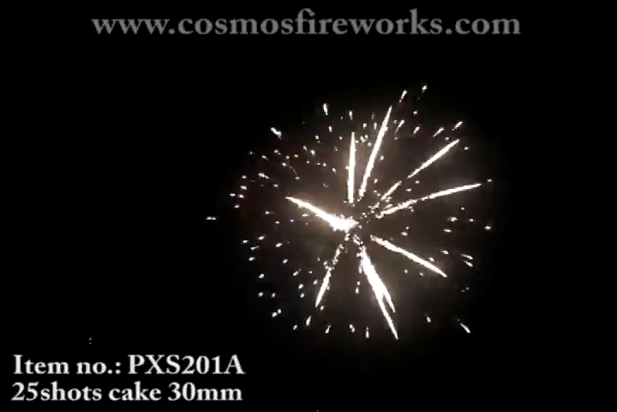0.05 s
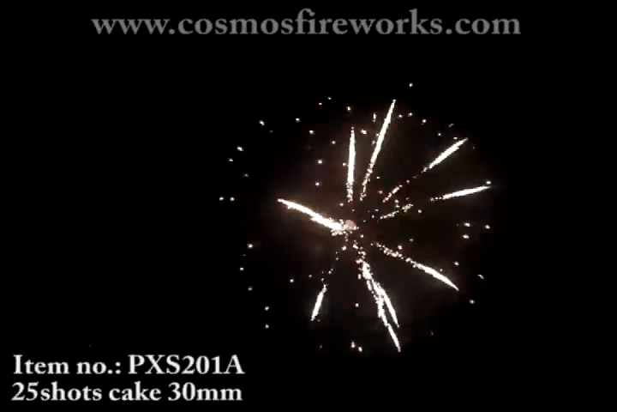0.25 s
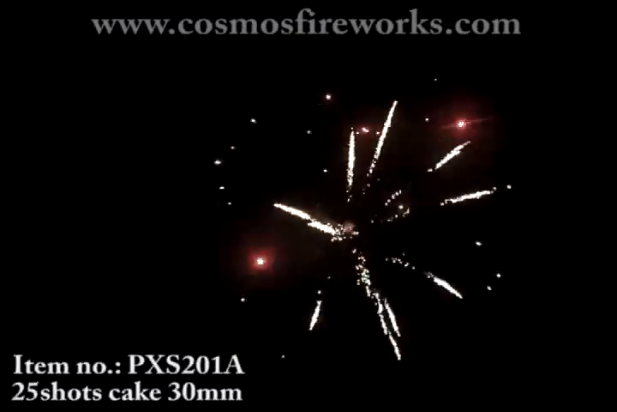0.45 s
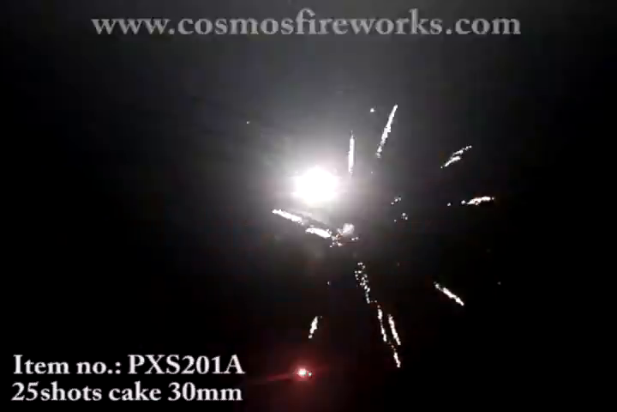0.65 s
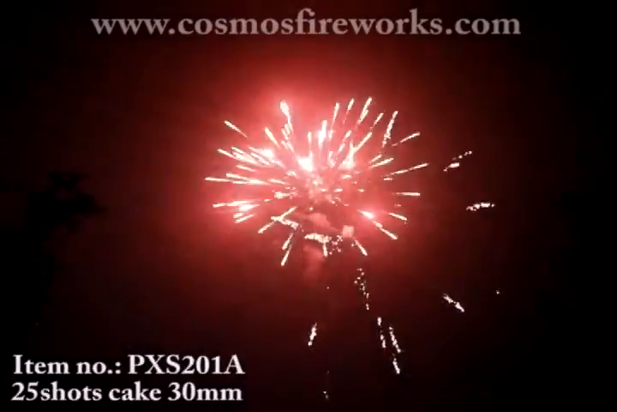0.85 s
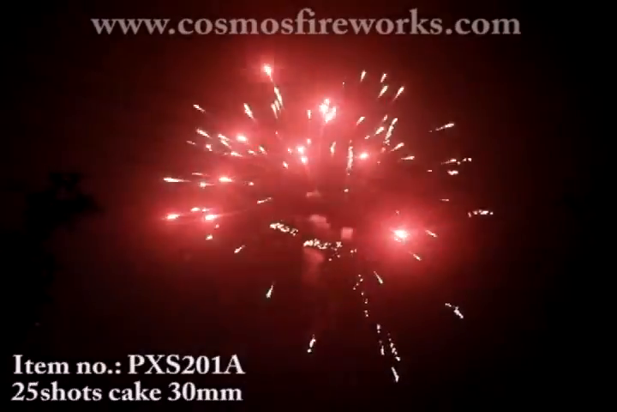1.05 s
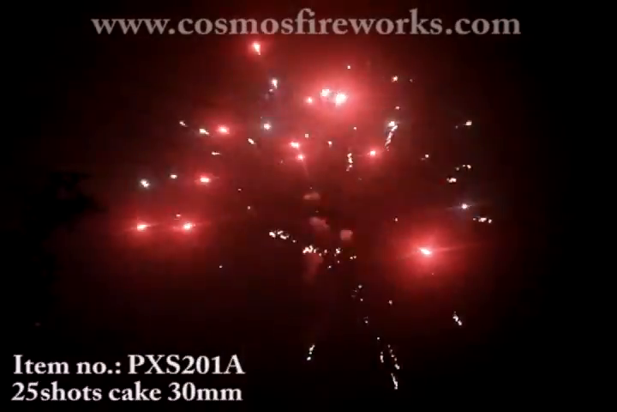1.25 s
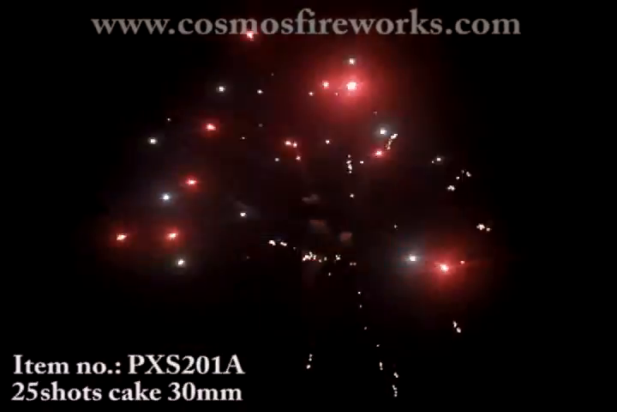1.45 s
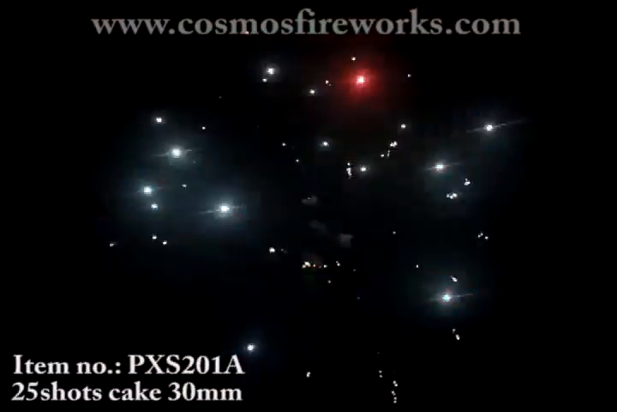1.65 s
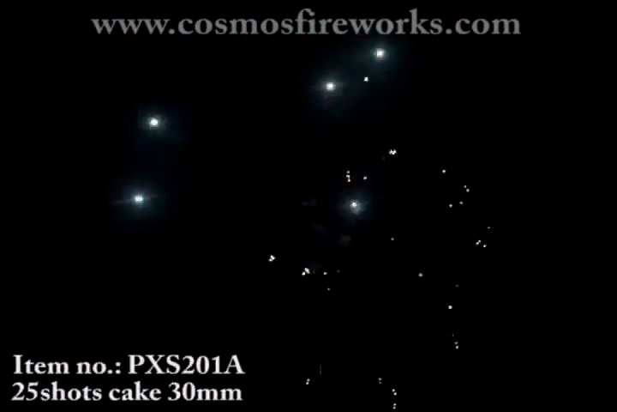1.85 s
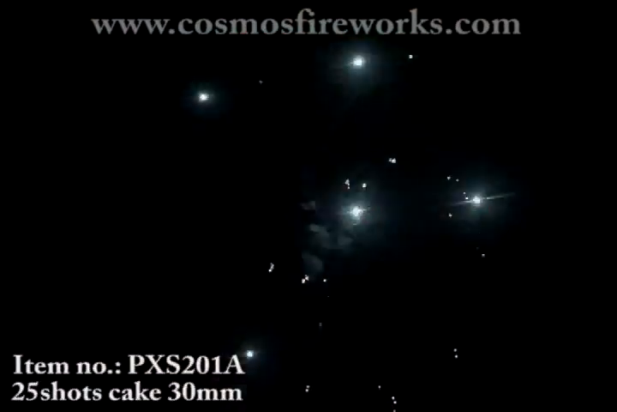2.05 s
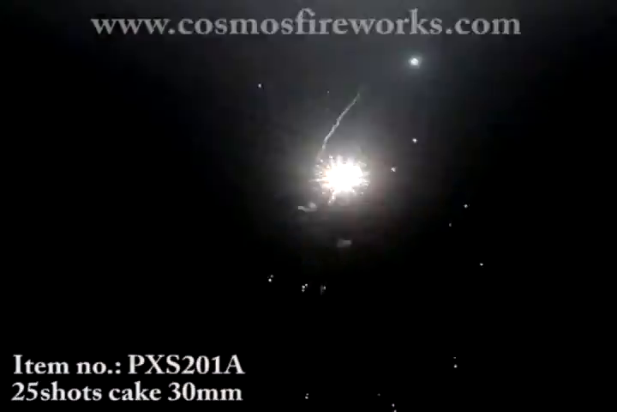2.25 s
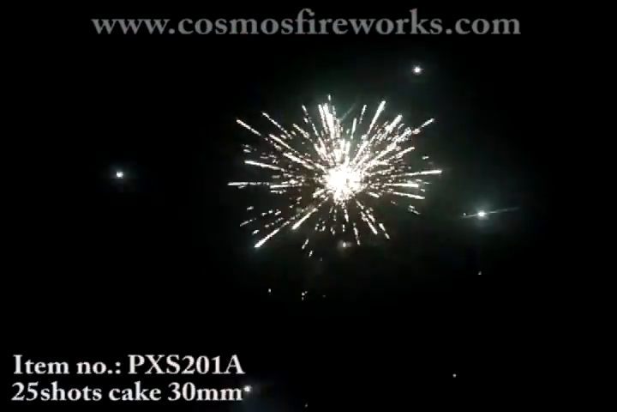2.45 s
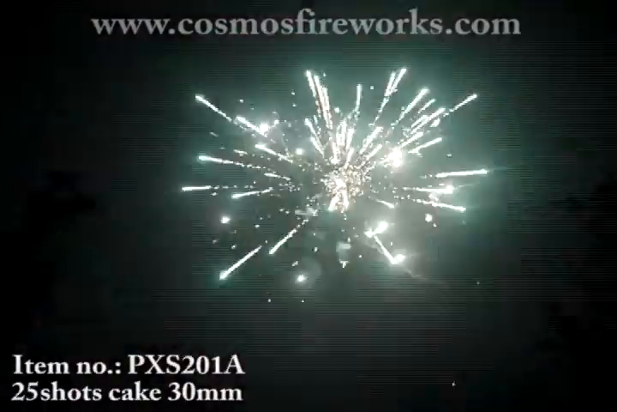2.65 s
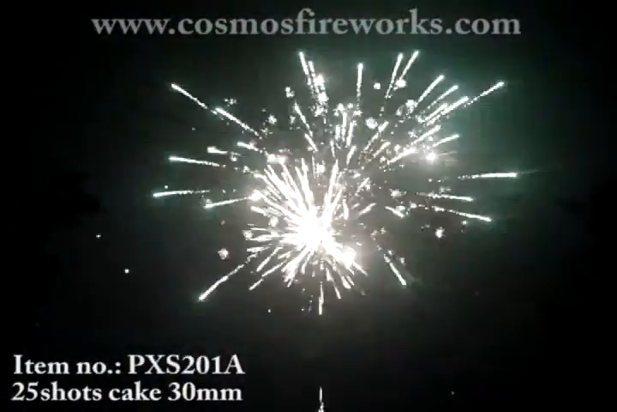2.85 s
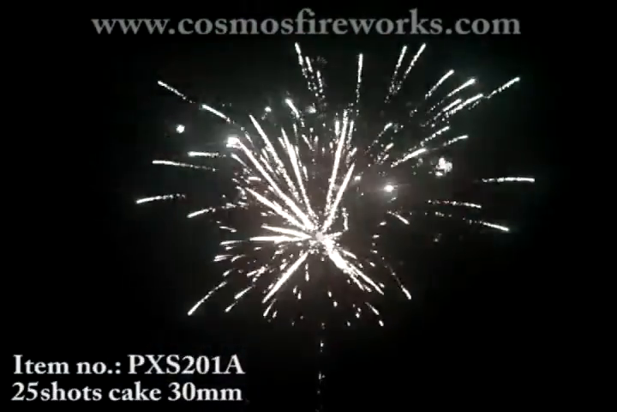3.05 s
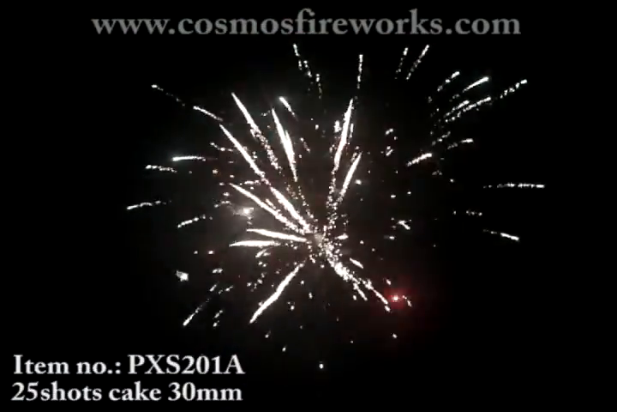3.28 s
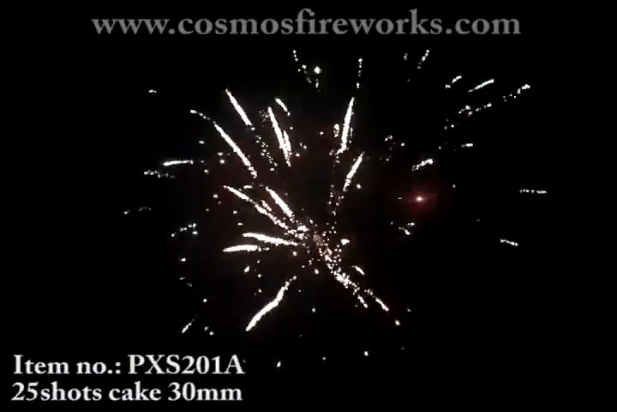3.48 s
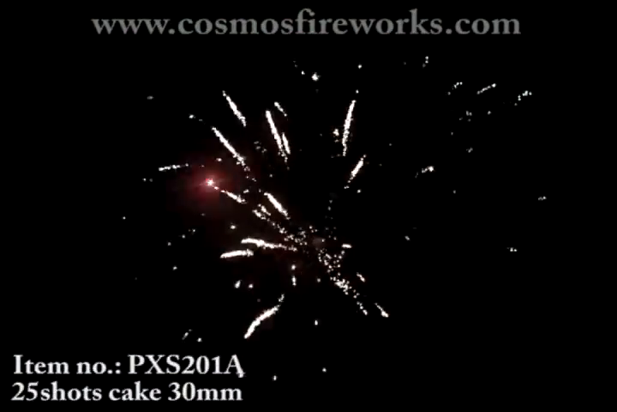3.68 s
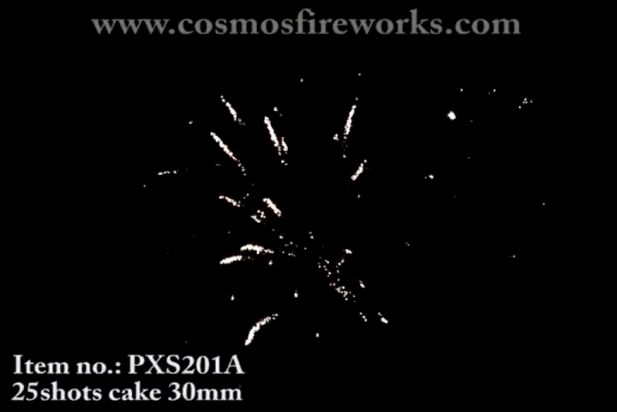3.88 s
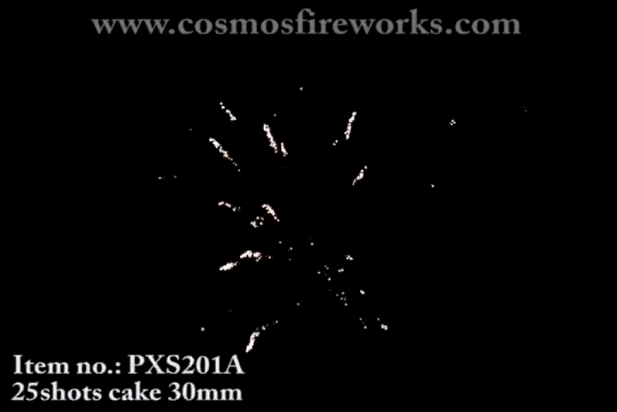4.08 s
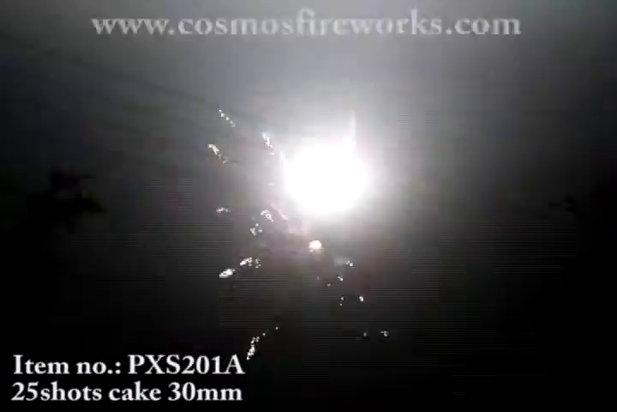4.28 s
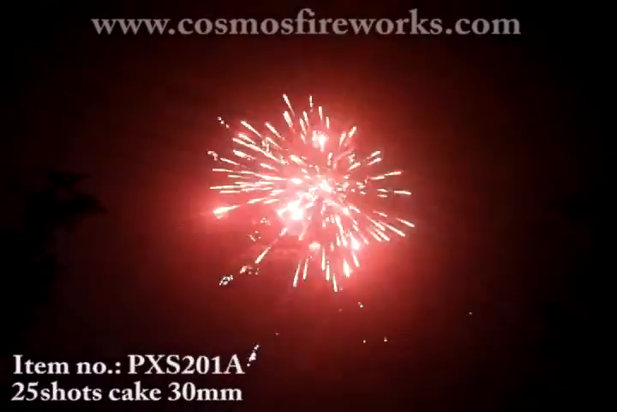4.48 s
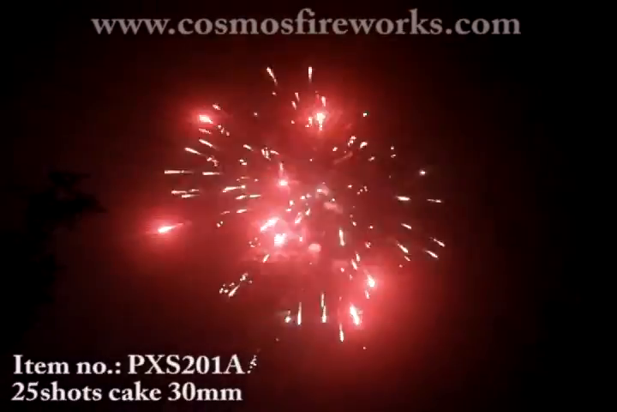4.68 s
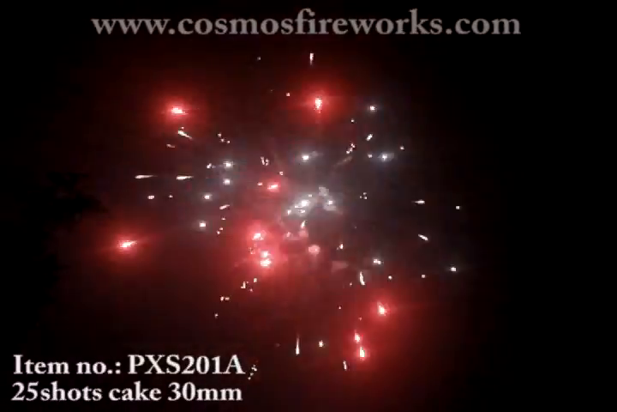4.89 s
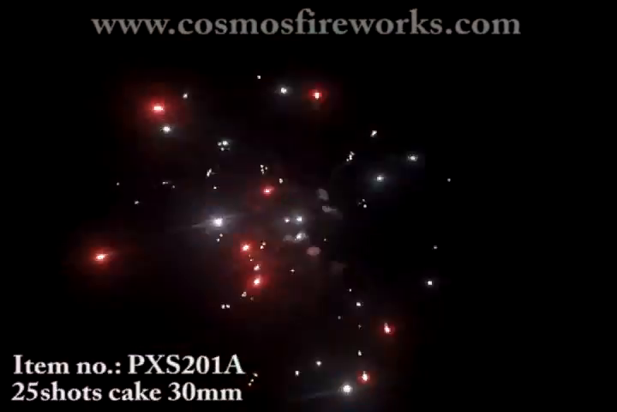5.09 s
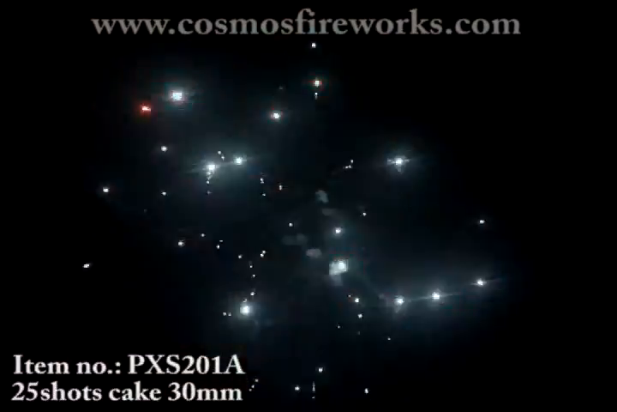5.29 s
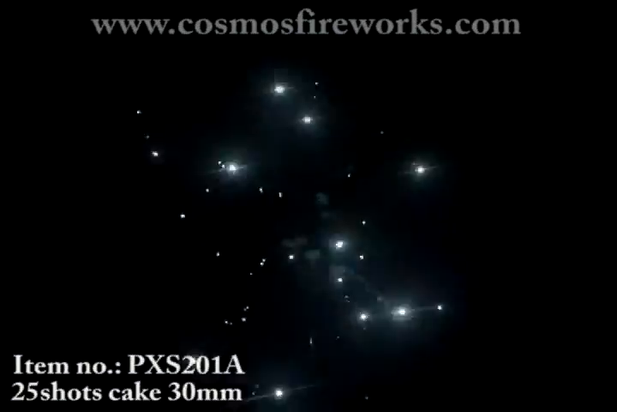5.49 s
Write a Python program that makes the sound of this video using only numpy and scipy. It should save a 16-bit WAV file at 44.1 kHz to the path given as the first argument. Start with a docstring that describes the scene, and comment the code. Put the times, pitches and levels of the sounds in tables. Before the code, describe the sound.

Open land at night, firework shells heard through a close, overloaded microphone. The sound begins in the tail of a burst, with a tree-line echo and dull knocks around 0.2 to 0.4 seconds and a sharp pop at 0.7. A hard bang hits at 1.0, with a short low ring, a noisy crack and an immediate wall slap; trees answer at 1.4, then woods and slopes return a rushing roll. A smaller pop snaps at 1.7 and the roll fades. The strongest bang comes at 2.6, another at 3.1, with bright crackling stars around and after them, densest from 3.0 to 3.5 and thinning by 3.8. Echoes sink into a faint airy hiss until about 4.6, when another heavy bang bursts at 4.66. Its tree echo arrives at 5.05, a pop snaps at 5.15, and the slopes roll back near 5.7. Loud hits clip and duck the level, which then recovers.

```python
"""Open land at night, with woods and slopes around: a firework cake fires shells close to a microphone.
Bursts ring damped low modes with a noise crack and a wall slap; the first starts before time zero.
Pops are shock pulses over a thump; crackling stars are tiny shocks; knocks are noise clumps on a low sine.
Filtered noise and click trains follow summed echoes of ground, tree line, woods and slopes, duller with travel.
The gain ducks on loud sound, then recovers; what is still too strong clips hard."""
import sys
import numpy as np
from scipy import signal
from scipy.fft import rfft, irfft
from scipy.io import wavfile

SR = 44100
rng = np.random.default_rng(int(sys.argv[2]) if len(sys.argv) > 2 else 0)


def put_to_file(sound):
    """Save the sound as 16-bit audio at rate SR, in the file named by the first command-line argument."""
    columns = np.atleast_2d(sound).T  # one column per channel
    safe = np.clip(columns, -1, 1)
    whole_steps = np.round(safe * 32767)
    wavfile.write(sys.argv[1], SR, whole_steps.astype(np.int16))


N = 243873  # samples

# Shell bursts; wall level is relative to the burst: start_s, strength_db, crack_db, pitch_factor,
# wall_db, tree_line_db, woods_db, slopes_delay_s, slopes_db
SHELL_BURSTS = [(-.085, 8, -2, 1.4, 2, -1, 3, 2.5, -7.5), (1.0178, 13, 0.5, 1.1, -5.5, -2, 0, 1.12, 0),
                (2.6210, 17, -3.5, 1.05, -8, -1, -4.5, 1.24, -7.5),
                (3.0630, 10, 1, 1.033, -6.5, -8, -4.5, 1.327, -3.5),
                (4.6576, 14.5, -2, 0.92, -7, 0, -3.5, 1.02, 1)]
# Travel times of each burst's sharp echoes: wall_delay_s, tree_line_delay_s
ECHO_DELAYS = [(.048, .408), (.0480, .383), (.0471, .391), (.0492, .356), (.0477, .390)]
# Modes a blast sets ringing near the microphone, before each burst's pitch factor and strength:
# mode_hz, relative_db, t60_s
BOOM_MODES = [(169.5, -22.5, 0.22), (223.6, -3.5, 0.037), (283, -1.5, 0.035), (330, 2, 0.031),
              (425.7, -5, 0.043), (567, -11.5, 0.022), (902.5, -2.5, 0.022)]
# Relative spectra of ground scatter and of the air's low roll, mid rush and high fizz: freq_hz, db_per_hz
SCATTER_SPECTRUM = [(30, -27), (80, 4.5), (170, 6.5), (300, 13.5), (450, 3), (650, -2), (1000, -1),
                    (2000, -7.5), (4000, -13), (8000, -25), (15000, -20.5)]
ROLL_SPECTRUM = [(20, -61), (50, -19.5), (100, -6.5), (160, -3), (260, 0.5), (350, 1), (450, -0.5),
                 (600, -18.5), (1200, -63), (4000, -71)]
RUSH_SPECTRUM = [(30, -31), (100, -35), (300, 0), (600, 1.5), (900, 3), (1300, 0), (1800, -2), (2600, -6),
                 (4000, -12.5), (6000, -23), (9000, -37.5), (15000, -104)]
FIZZ_SPECTRUM = [(500, -29), (3000, 7), (6000, 8.5), (9000, 6.5), (12000, 3.5), (15000, -14), (17000, -36)]
# How each part of the land returns a burst: rise_db_per_s, hold_s, fall_db_per_s,
# (roll_db, rush_db, bright_edge_db, fizz_db)
GROUND = (900, 0.017, 18.4, (-20.5, -34.5, -37, -34.5))
TREE_LINE = (119, 0.013, 115, (-18.5, -24, -21.5, -28))
WOODS = (43, 0.2, 21.2, (-24, -24, -27, -44.5))
SLOPES = (30, 0.11, 33, (-23.5, -23, -31.5, -61))
# Air loss per second of travel: roll_db_per_s, rush_db_per_s, bright_edge_db_per_s, fizz_db_per_s
AIR_LOSS_DB_PER_S = (2.4, .3, 10.9, 37.2)
# The night's own noise: roll_db, rush_db, bright_edge_db, fizz_db
NIGHT_DB = (-34.5, -34.5, -50, -65)
# Hard surfaces near the tree line: after_tree_line_echo_s, level_db (relative to the tree line level)
TREE_KNOCKS = [(-.06, -14.5), (0, -7), (.018, -9), (0.068, -14.5)]
# More dull knocks, each with its own time and bass: start_s, level_db, bass_db
DULL_KNOCKS = [(.212, -17.5, -34), (.243, -13.5, -21), (.256, -10, -13.5), (0.7787, -14.5, -17),
               (2.274, -28, -34), (4.3053, -31, -25)]
# Nearest crackling stars: start_s, peak_db
NEAR_STARS = [(.3388, -3), (2.7806, 2), (2.9910, 0), (2.9930, 0), (3.0362, -4), (3.0497, -1), (3.1985, -6),
              (3.3984, 0), (3.4215, 0), (3.4258, 2), (3.4428, -1), (3.5145, -5), (3.7028, -2), (3.7800, 0),
              (3.7891, -9), (3.8275, -10)]
# Pops: start_s, snap_db, snap_push_s, thump_db, spray_db
POPS = [(0.7193, 16, 0.00038, -0.5, -4), (1.6730, 10, 0.00019, -4.5, -8), (5.1506, 14, 0.00031, -8.5, -10)]

WOODS_BEHIND_S = 0.11  # after the tree line
RANDOM_STARS, RANDOM_STAR_DB, RANDOM_STAR_SPAN_S = 18, -8, (2.95, 3.47)
DUCK_ABOVE_DB, DUCK_ATTACK_S, RECOVER_DB_PER_S = -12.5, 0.16, 27.5
CLIP_LEVEL, BAND_LIMIT_HZ = 0.985, 15950


def gain_of(db):
    """Decibels to amplitude."""
    return 10 ** (np.asarray(db) / 20)


def decay(t, level_db, t60_s):
    """Exponential decay from level_db, 60 dB per t60_s."""
    return gain_of(level_db - 60 * t / t60_s)


def evened(x):
    """Scales to rms 1."""
    return x / np.sqrt(np.mean(x ** 2) + 1e-20)


def noise(t):
    """White noise, one draw per time step."""
    return rng.standard_normal(len(t))


def read(points, hz):
    """Joins spectrum points by lines on a log-frequency axis."""
    f, value = np.transpose(points)
    return np.interp(np.log(hz + 1), np.log(f + 1), value)


def add(mix, start_s, sound):
    """Adds a sound into the mix; what falls outside is dropped."""
    start = round(start_s * SR)
    sound = sound[max(-start, 0):]
    part = mix[max(start, 0):][:len(sound)]
    part += sound[:len(part)]


def band(x, low_hz, high_hz, order=1):
    """Causal band-pass."""
    edges_hz = [low_hz, min(high_hz, SR / 2 - 1)]
    return signal.sosfilt(signal.butter(order, edges_hz, "band", fs=SR, output="sos"), x)


def coloured(x, spectrum):
    """Gives x a spectrum, at rms 1."""
    shape_db = read(spectrum, np.fft.rfftfreq(len(x), 1 / SR))
    return evened(irfft(rfft(x) * gain_of(shape_db), len(x)))


def blast(t, push_s):
    """A shock front: a sudden push, then a longer, weaker suction."""
    return (1 - t / push_s) * np.exp(-t / push_s)


def bursts():
    """Each shock rings low modes; ground scatter follows and a wall returns it duller."""
    out, t = np.zeros(N), np.arange(SR // 3) / SR
    for burst, (wall_s, _) in zip(SHELL_BURSTS, ECHO_DELAYS):
        start_s, strength_db, crack_db, pitch, wall_db, *_ = burst
        boom = sum(decay(t, db, t60_s) * np.cos(2 * np.pi * hz * pitch * t) for hz, db, t60_s in BOOM_MODES)
        boom += decay(t, 8.5, t60_s=0.0018) * noise(t)  # the casing tears
        scatter = coloured(noise(t), SCATTER_SPECTRUM)
        scatter *= decay(t, -14.5, t60_s=0.059) + decay(t, -17.5, t60_s=0.17)
        add(boom, 0.004, gain_of(crack_db) * scatter)
        wall_slap = gain_of(strength_db + wall_db) * band(boom, 66, 6000)
        add(out, start_s + wall_s, wall_slap)
        # one hard bounce off the ground close by, with a deep push under it
        crack = band(noise(t), 1400, 11000) * decay(t, crack_db, t60_s=0.0041)
        push = decay(t, -26.0, t60_s=0.044) * np.sin(2 * np.pi * 65 * t)
        push += gain_of(-13.5) * blast(t, push_s=0.0014)
        add(boom, 0.0042, crack + push)
        add(out, start_s, gain_of(strength_db) * boom)
    return out


def echo_power(age_s, delay_s, level_db, land):
    """One echo in four bands: rises until its delay, holds, falls; air loss grows with age."""
    rise_db_per_s, hold_s, fall_db_per_s, bands_db = land
    shape_db = -rise_db_per_s * np.maximum(delay_s - age_s, 0)
    shape_db -= fall_db_per_s * np.maximum(age_s - delay_s - hold_s, 0)
    loss_db = np.outer(AIR_LOSS_DB_PER_S, np.maximum(age_s, 0))
    return (age_s > 0) * gain_of(level_db + shape_db + np.array(bands_db)[:, None] - loss_db) ** 2


def echo_levels():
    """Sums burst echoes and night noise as power: dB curves of roll, rush, bright edge, fizz."""
    t = np.arange(0, N, 64) / SR
    power = gain_of(NIGHT_DB)[:, None] ** 2
    for burst, (_, trees_s) in zip(SHELL_BURSTS, ECHO_DELAYS):
        start_s, *_, trees_db, woods_db, slopes_s, slopes_db = burst
        paths = [(0, 0, GROUND),
                 (trees_s, trees_db, TREE_LINE),
                 (trees_s + WOODS_BEHIND_S, woods_db, WOODS),
                 (slopes_s, slopes_db, SLOPES)]
        power = power + sum(echo_power(t - start_s, *path) for path in paths)
    return [np.interp(np.arange(N) / SR, t, 10 * np.log10(p)) for p in power]


def wander(top_hz):
    """Random drift of rms 1, from top_hz / 4 to top_hz."""
    hz = np.fft.rfftfreq(N, 1 / SR)
    inside = (hz > top_hz / 4) * (hz < top_hz)
    return evened(irfft(rfft(rng.standard_normal(N)) * inside, N))


def grains(per_s, spread_db):
    """Random click train of rms 1, a few clicks much larger than the rest."""
    size = gain_of(spread_db * np.minimum(rng.exponential(1, N), 4))
    return evened(size * rng.standard_normal(N) * (rng.random(N) < per_s / SR))


def follow(x, level_db, low_hz, high_hz):
    """Scales x to unit level in the band low_hz..high_hz, then applies a level curve."""
    hz = np.fft.rfftfreq(N, 1 / SR)
    in_band = abs(hz - (low_hz + high_hz) / 2) < (high_hz - low_hz) / 2
    inside = irfft(rfft(x) * in_band, N)
    return x / inside.std() * gain_of(level_db)


def air():
    """Countless small echoes: lumpy low roll, grainy rush that dulls as it fades, thin fizz."""
    roll_db, rush_db, bright_db, fizz_db = echo_levels()
    lumps, surges = wander(top_hz=18), wander(top_hz=30)
    roll = coloured(rng.standard_normal(N), ROLL_SPECTRUM)
    rush = coloured(grains(per_s=11000, spread_db=0.66), RUSH_SPECTRUM)
    dull = signal.sosfiltfilt(signal.butter(2, 2800, fs=SR, output="sos"), rush)
    fizz = coloured(grains(per_s=6400, spread_db=1.5), FIZZ_SPECTRUM)
    roll = follow(roll, roll_db, 150, 500)
    body = follow(dull, rush_db, 600, 2500)
    bright_edge = follow(rush - dull, bright_db, 3000, 5500)
    fizz = follow(fizz, fizz_db, 8000, 13000)
    lumpy_roll = gain_of(-1.3 + 1.24 * lumps) * roll
    surging_rush = gain_of(0.76 * surges) * (gain_of(-1.17) * body + gain_of(-2.5) * bright_edge)
    return lumpy_roll + surging_rush + gain_of(-0.9) * fizz


def knock(level_db, bass_db):
    """A dull knock: a short, ragged noise clump over a low bump, with little treble."""
    t = np.arange(SR // 10) / SR
    clump = band(evened(band(noise(t), 380, 870)), 70, 3750, order=2)
    bump = np.sin(2 * np.pi * 125 * t)
    return decay(t, level_db, t60_s=0.046) * clump + decay(t, bass_db, t60_s=0.063) * bump


def knocks():
    """Hard surfaces by the tree line return every burst; a few more dull knocks have own time and bass."""
    out = np.zeros(N)
    for burst, (_, trees_s) in zip(SHELL_BURSTS, ECHO_DELAYS):
        start_s, *_, trees_db, _, _, _ = burst
        for after_s, relative_db in TREE_KNOCKS:
            level_db = trees_db + relative_db
            add(out, start_s + trees_s + after_s, knock(level_db, level_db - 14.5))
    for start_s, level_db, bass_db in DULL_KNOCKS:
        add(out, start_s, knock(level_db, bass_db))
    return out


def cracks():
    """Each crackling star is one tiny shock with a brief scatter behind it."""
    out, t = np.zeros(N), np.arange(SR // 30) / SR
    random_starts_s = rng.uniform(*RANDOM_STAR_SPAN_S, size=RANDOM_STARS)
    random_stars = [(start_s, RANDOM_STAR_DB) for start_s in random_starts_s]
    for start_s, peak_db in list(NEAR_STARS) + random_stars:
        scatter = decay(t, -28, t60_s=0.054) * noise(t)
        shock = band(blast(t, push_s=0.00013) + scatter, 200, 5700, order=3)
        add(out, start_s, gain_of(peak_db) * shock / abs(shock).max())
    return out


def pops():
    """A short shock snap, a low thump, a noise spray and a faint noise tail, with a weaker, duller echo."""
    out, t = np.zeros(N), np.arange(SR // 4) / SR
    for start_s, snap_db, push_s, thump_db, spray_db in POPS:
        snap = gain_of(snap_db) * band(blast(t, push_s), 1080, 3100, order=2)
        thump = decay(t, thump_db, t60_s=0.024) * np.sin(2 * np.pi * 135 * t)
        spray = decay(t, spray_db, t60_s=0.022) * evened(band(noise(t), 520, 1700))
        pop = snap - band(thump, 60, 3000) + spray
        hiss_tail = decay(t, spray_db - 26.5, t60_s=0.47) * band(noise(t), 3500, 11200, order=2)
        add(out, start_s, pop + hiss_tail)
        echo = gain_of(-10.5) * band(pop, 60, 2200)
        add(out, start_s + 0.059, echo)
    return out


def scene():
    """Everything at one microphone, whose output swings negative on a push."""
    return (air() - bursts() - pops() - cracks() - knocks())[None]


def record(dry):
    """Gain control ducks on loud sound and recovers; hard clipping, then a band limit."""
    keep = np.exp(-1 / (DUCK_ATTACK_S * SR))
    power = signal.lfilter([1 - keep], [1, -keep], np.minimum(dry[0] ** 2, 1))
    over_db = np.maximum(10 * np.log10(power + 1e-12) - DUCK_ABOVE_DB, 0)
    recovery_db = RECOVER_DB_PER_S * np.arange(N) / SR
    # the deepest duck so far holds, less the recovery since
    ducked = dry * gain_of(recovery_db - np.maximum.accumulate(over_db + recovery_db))
    clipped = np.clip(ducked, -CLIP_LEVEL, CLIP_LEVEL)
    low_pass = signal.firwin(255, BAND_LIMIT_HZ, window=("kaiser", 8), fs=SR)
    return signal.oaconvolve(clipped, low_pass[None], "same")


dry = scene()
out = record(dry)
put_to_file(out)
```